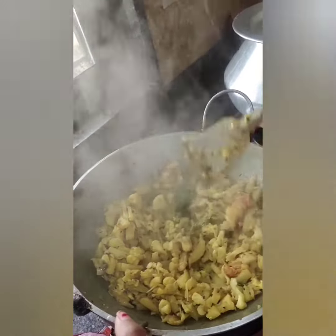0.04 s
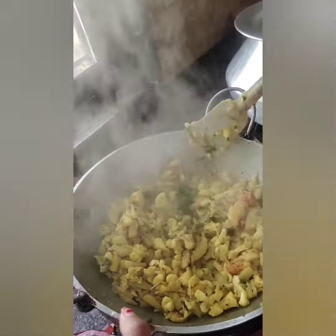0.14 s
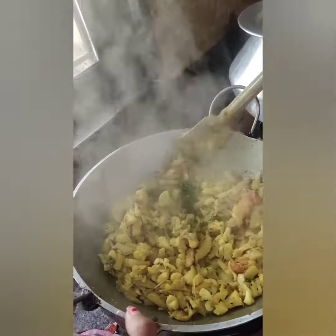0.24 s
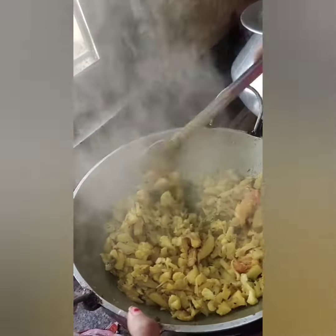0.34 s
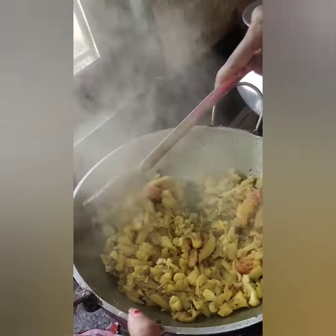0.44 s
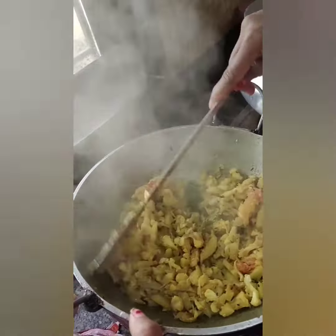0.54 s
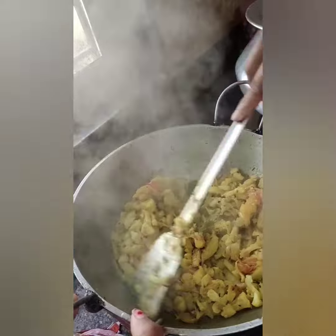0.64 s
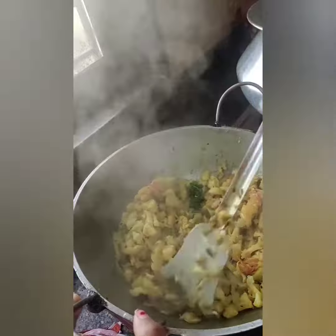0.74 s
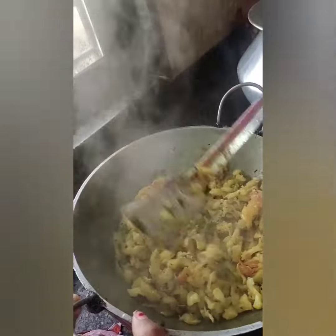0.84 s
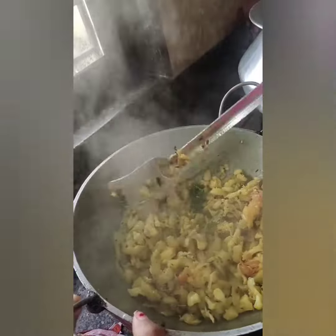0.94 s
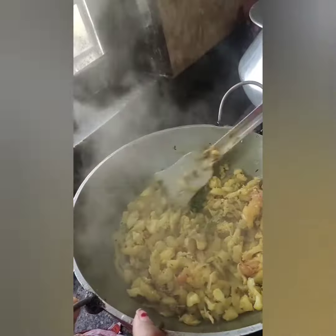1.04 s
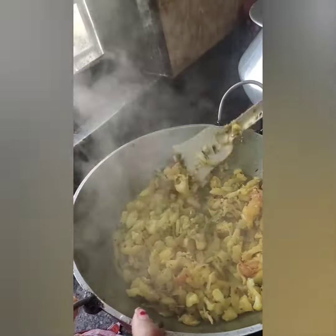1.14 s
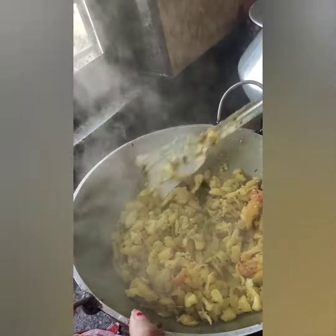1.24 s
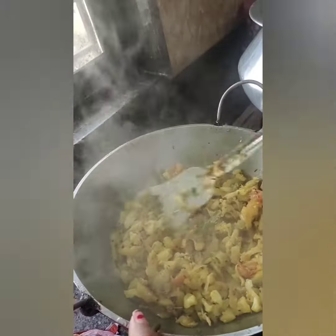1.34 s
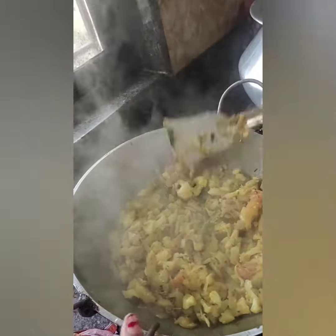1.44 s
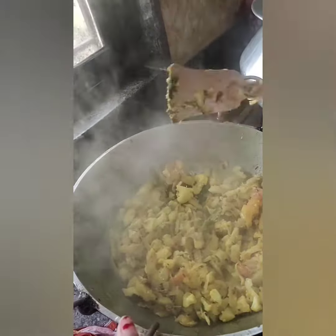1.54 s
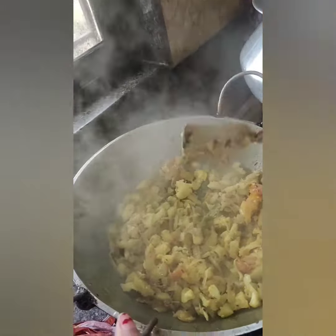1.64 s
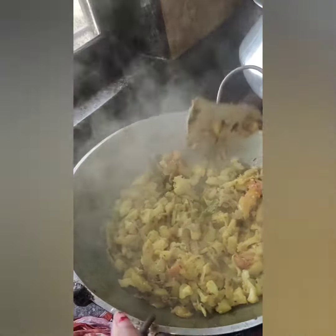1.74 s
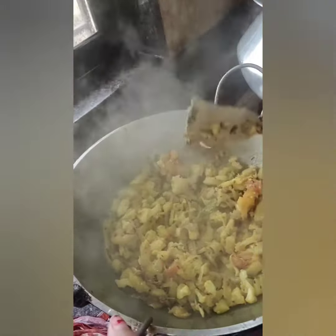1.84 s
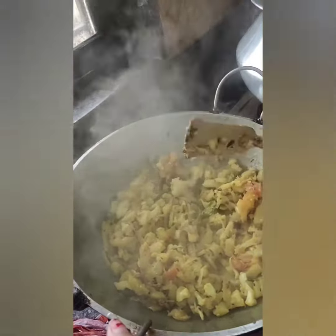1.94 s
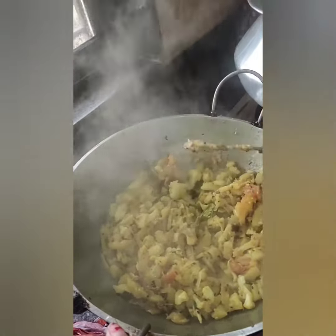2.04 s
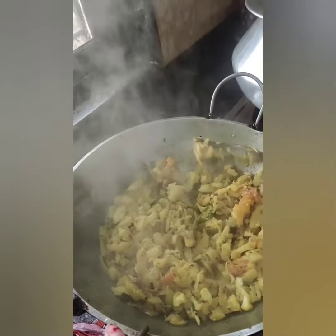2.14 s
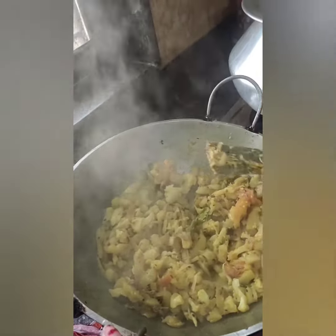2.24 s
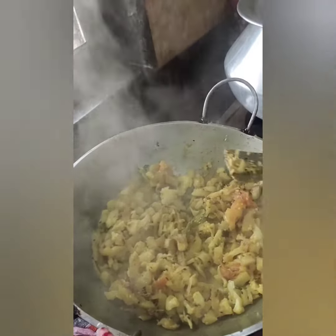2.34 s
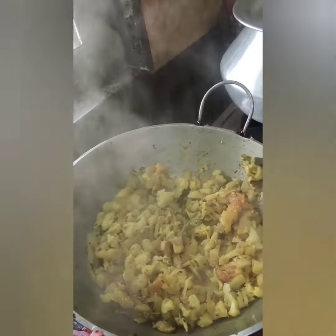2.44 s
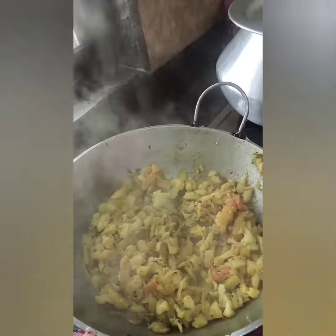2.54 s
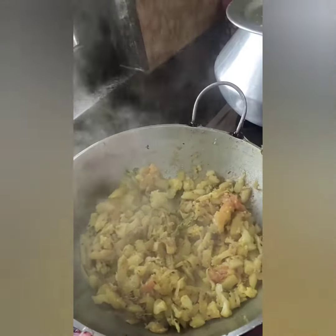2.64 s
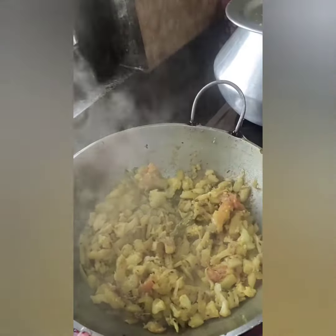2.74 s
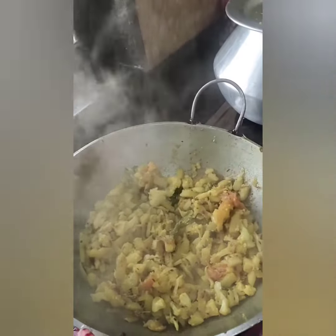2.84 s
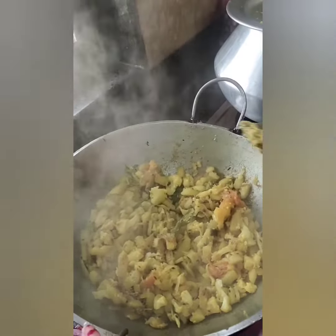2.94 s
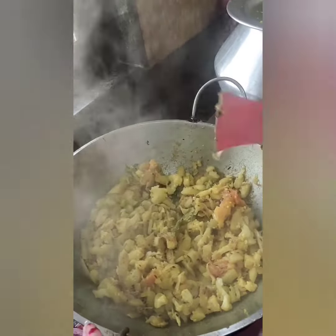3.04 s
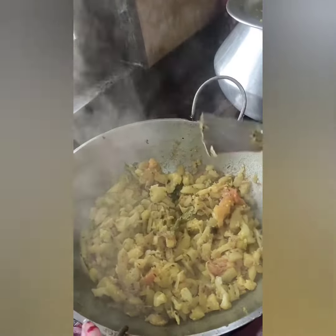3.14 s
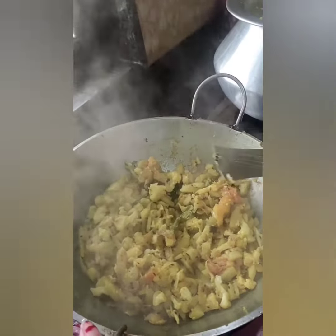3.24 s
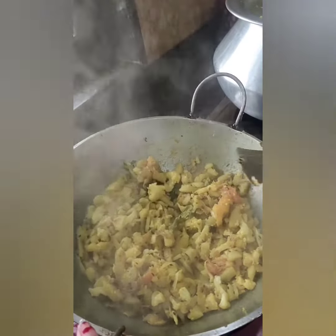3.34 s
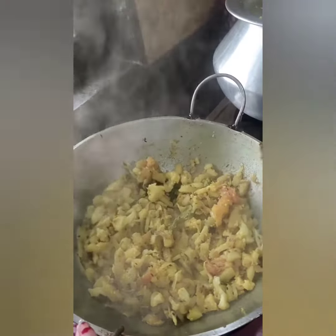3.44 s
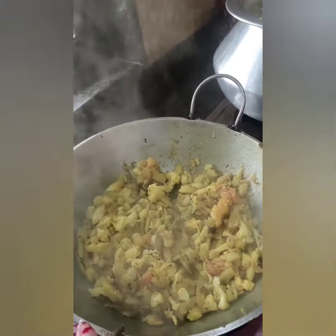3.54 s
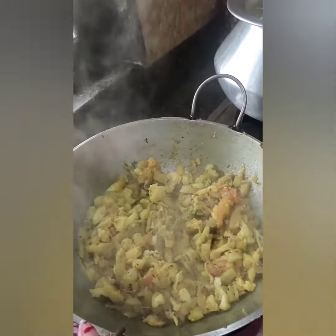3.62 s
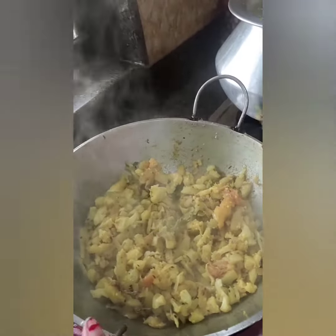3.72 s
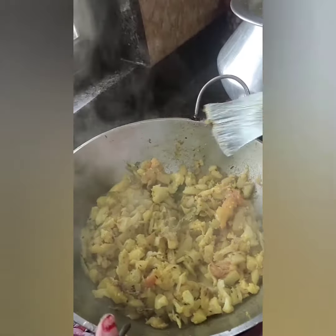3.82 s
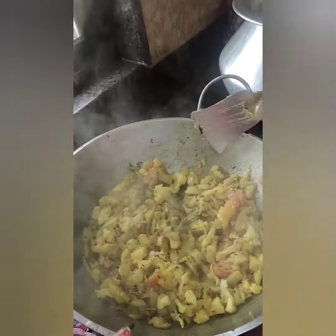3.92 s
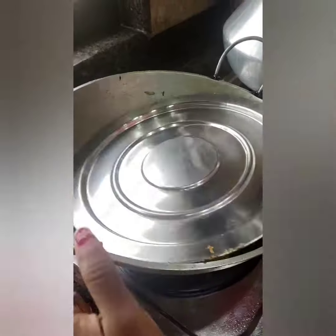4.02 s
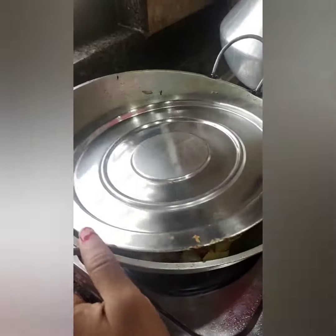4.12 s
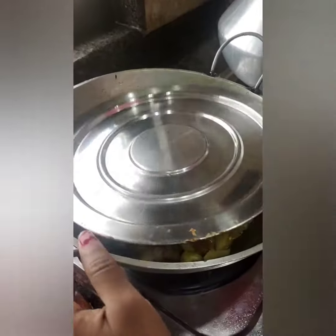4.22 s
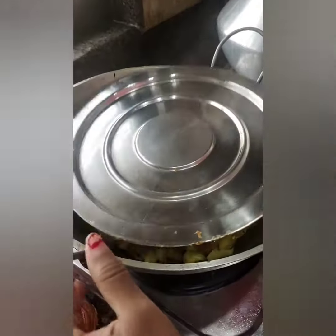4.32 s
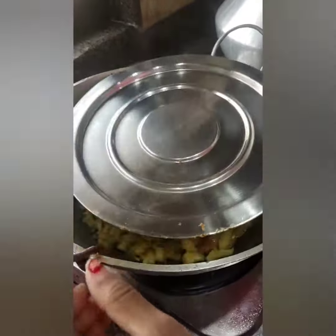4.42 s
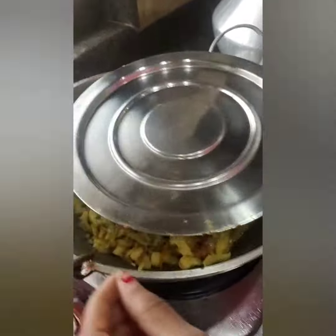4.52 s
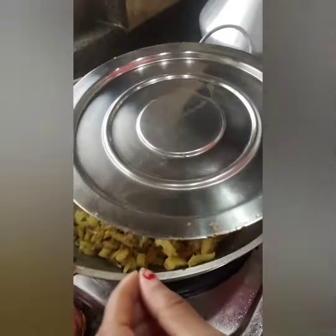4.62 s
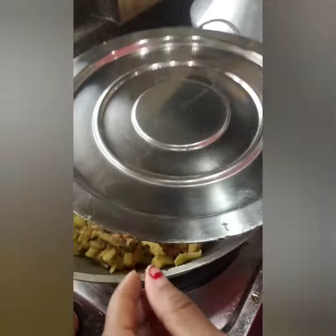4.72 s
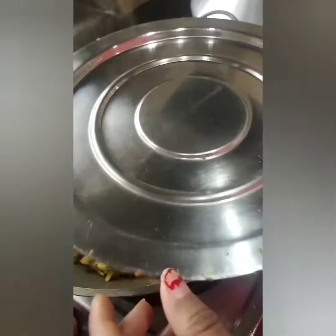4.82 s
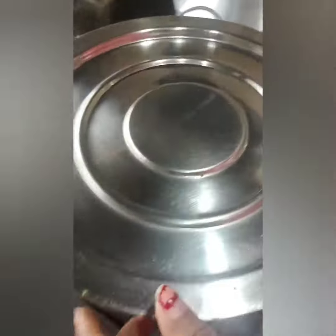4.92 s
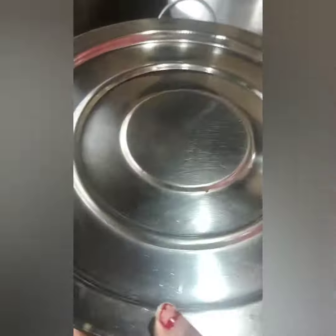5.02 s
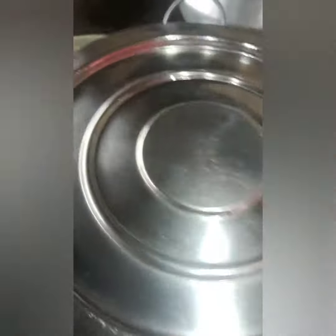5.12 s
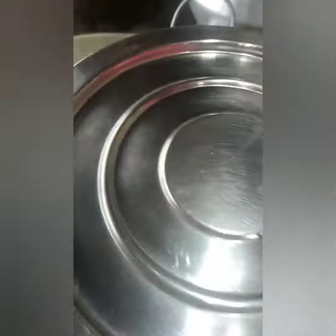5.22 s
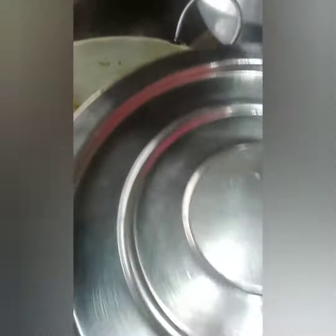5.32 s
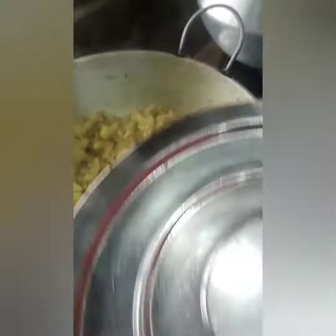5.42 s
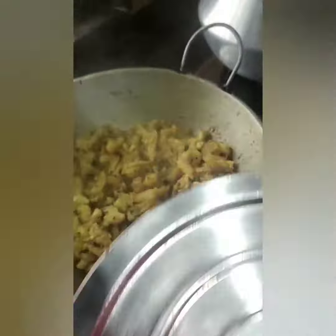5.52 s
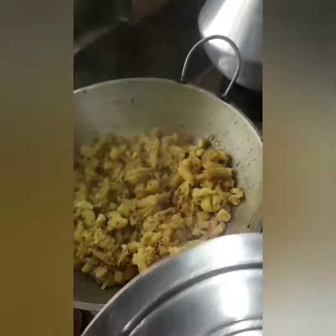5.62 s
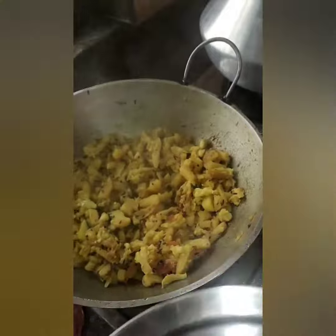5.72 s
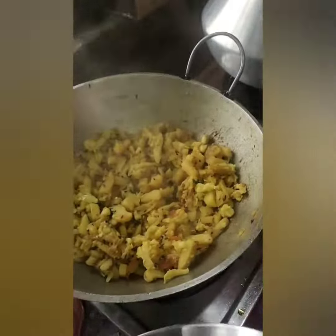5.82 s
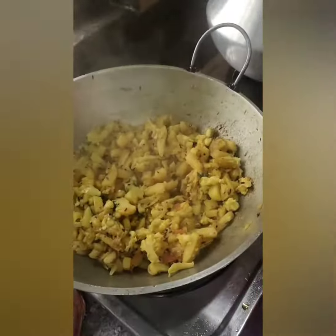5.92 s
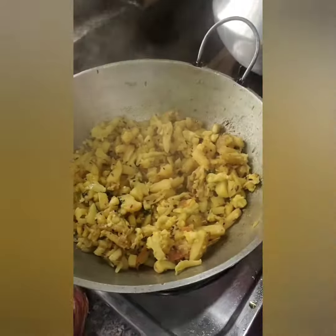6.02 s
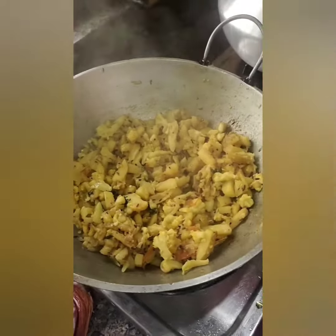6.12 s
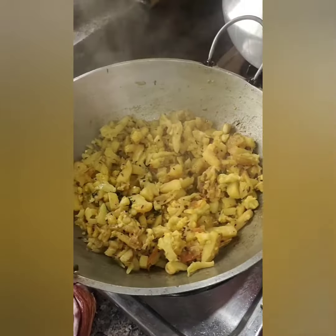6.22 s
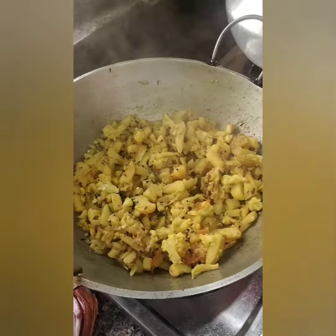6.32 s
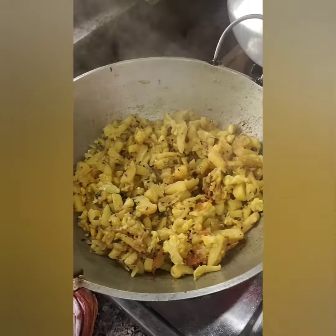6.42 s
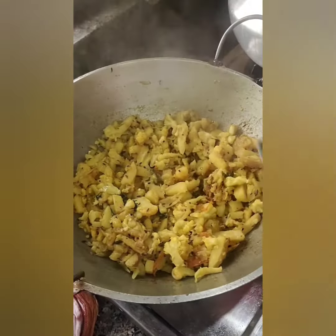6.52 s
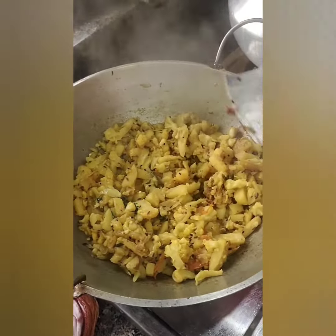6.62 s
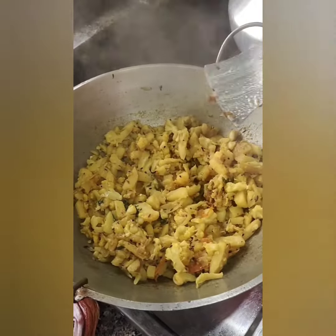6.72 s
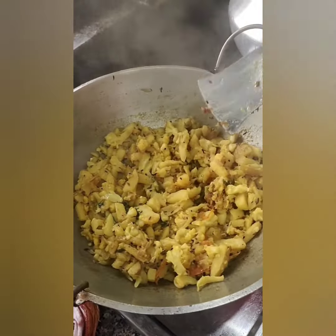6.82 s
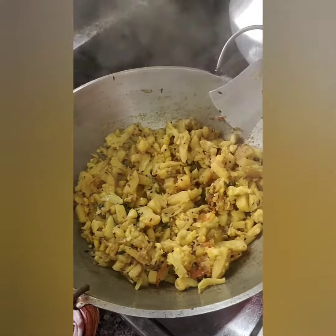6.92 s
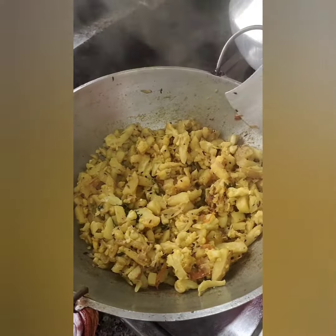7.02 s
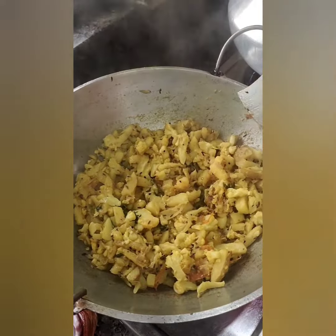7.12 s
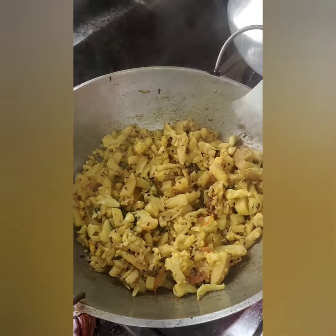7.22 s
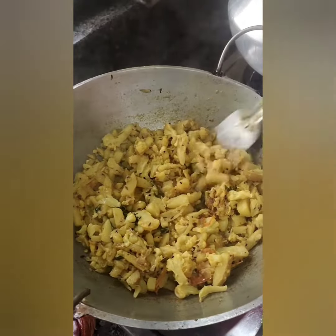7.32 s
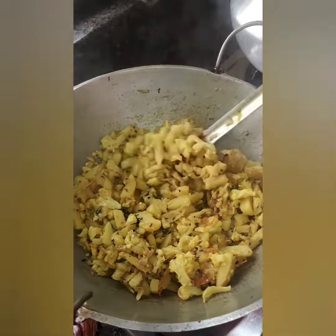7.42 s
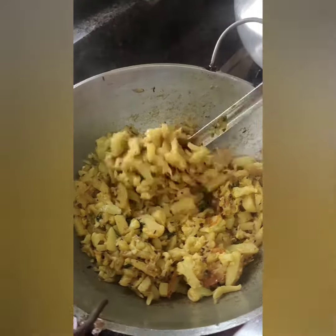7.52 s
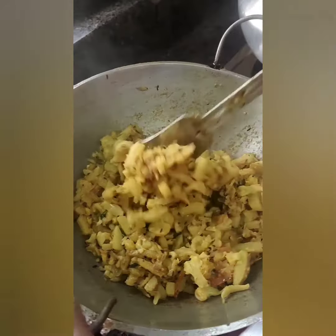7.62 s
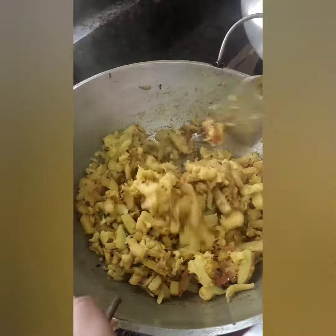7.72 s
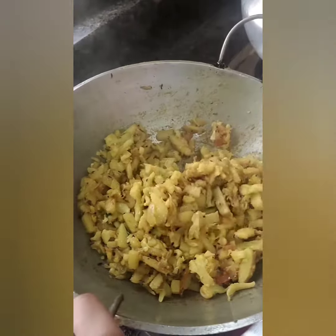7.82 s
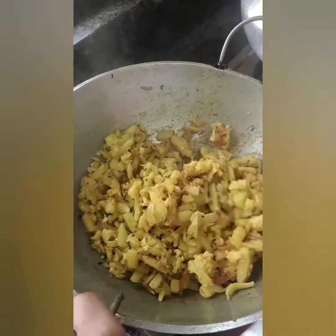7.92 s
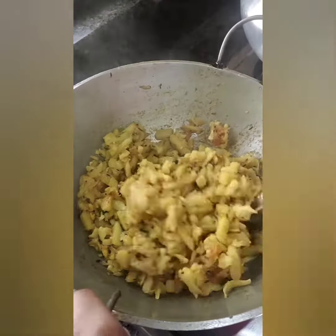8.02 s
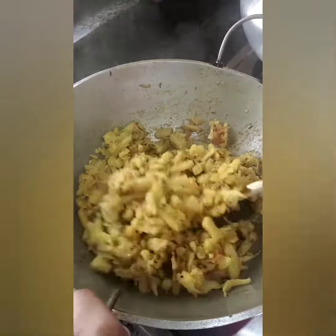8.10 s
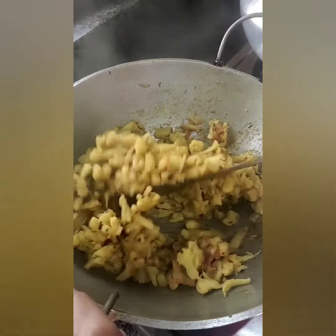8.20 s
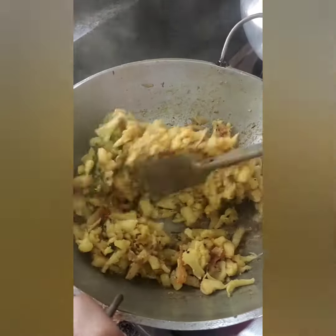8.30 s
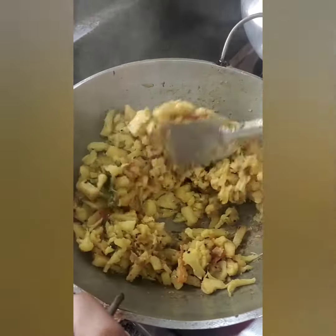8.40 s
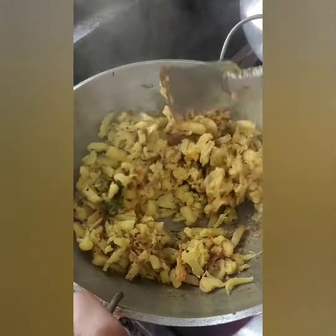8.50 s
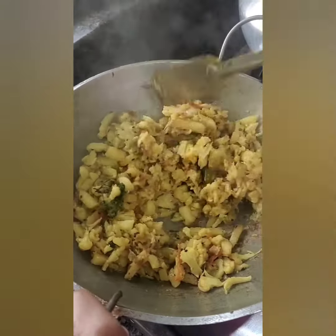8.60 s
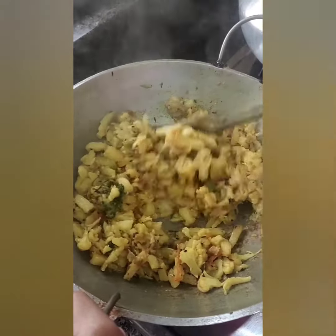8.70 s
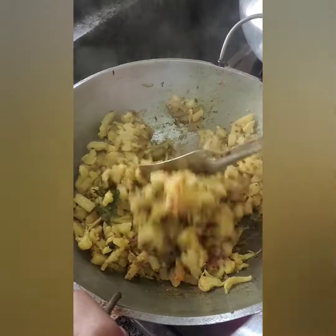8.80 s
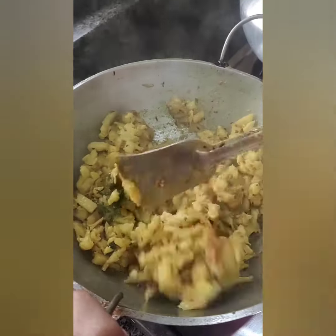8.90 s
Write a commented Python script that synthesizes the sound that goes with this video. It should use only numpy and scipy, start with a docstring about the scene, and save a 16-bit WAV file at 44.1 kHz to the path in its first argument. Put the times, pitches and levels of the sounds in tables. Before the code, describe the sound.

Vegetables sizzle in a metal wok over a roaring gas burner while a steel spatula clanks, scrapes and turns the food, with one brief mid-way silence.

```python
"""A small kitchen: vegetables sizzle close by in a metal wok, over a gas burner that roars as filtered noise.
The frying is dense noise with random spits; food tipped off the blade patters on the wok's low resonances.
A steel spatula knocks as pulses and short crashes on ringing modes, scrapes as stick-slip grains through
resonances, and at times makes the bowl sing one note. A steel lid brushes the rim with its own modes
and faint high hisses as the sound fades back in from a brief drop-out near half way."""
import sys
import numpy as np
from scipy.fft import rfft, irfft, next_fast_len
from scipy.io import wavfile
from scipy.ndimage import map_coordinates

SR = 44100
rng = np.random.default_rng(int(sys.argv[2]) if len(sys.argv) > 2 else 0)


def int16_out(signal):
    """Quantize to a 16-bit WAV file."""
    q = np.round(np.clip(np.atleast_2d(signal).T, -1, 1) * 32767)
    wavfile.write(sys.argv[1], SR, q.astype(np.int16))


N = 395119

# resonances of the spatula's blade: (centre [Hz], width [Hz], relative level [dB])
BLADE = [(6530, 150, 1.5), (6740, 110, -3), (6945, 200, 3), (7180, 90, -2.5), (7090, 52, 8),
         (7280, 120, 0.5), (7470, 84, 5), (7850, 120, -0.5), (8200, 260, -11.5), (8900, 220, -16.5)]
# bright spectrum of the blade's edge: (frequency [Hz], relative density [dB per Hz])
EDGE = [(4000, -24), (6000, 4), (8500, 5), (10000, 0.5), (12500, 2.5), (14000, -2.5), (16000, -21)]
# attack of a stroke, a sung note and a high hiss [s]
BITE_S = .025


def amp(db):
    """Decibels to gain."""
    return 10 ** (np.asarray(db) / 20)


def unit(x):
    """Scale to rms 1."""
    return x / np.sqrt(np.mean(x ** 2) + 1e-20)


def along(points, hz):
    """(Hz, value) points read on a log frequency axis."""
    f, v = np.transpose(points)
    return np.interp(np.log(hz + 1), np.log(f + 1), v)


def curves(rows):
    """One value per sample for each column after the time."""
    s, *cols = np.transpose(rows)
    return [np.interp(np.arange(N) / SR, s, c) for c in cols]


def wobble(rate):
    """A smooth random curve with rate knots a second."""
    knots = rng.standard_normal(int(N * rate / SR) + 4)
    return map_coordinates(knots, [np.arange(N) * rate / SR])


def gesture(start, length, attack, t60, slope_db=0):
    """Attack, a hold that drifts by slope_db a second, then an exponential release."""
    t = np.arange(N) / SR - start
    hold_db = slope_db * t.clip(0, length)
    release_db = -60 * (t - length).clip(0) / t60
    return np.clip(t / attack, 0, 1) * amp(hold_db + release_db)


def filtered(x, response):
    """x times a response of frequency."""
    n = x.shape[-1]
    m = next_fast_len(n + 8192)  # spare room for the filter's tail
    return irfft(rfft(x, m) * response(np.fft.rfftfreq(m, 1 / SR)), m)[..., :n]


def colour(points):
    """The response of a spectrum given as (Hz, dB) points."""
    return lambda hz: amp(along(points, hz))


def resonances(modes):
    """The response of a set of (Hz, width, dB) resonances, summed with alternating sign."""
    def response(f):
        total = 0
        for k, (centre, width, db) in enumerate(modes):
            total = total + (-1) ** k * amp(db) * 1j * f * width / (centre ** 2 - f ** 2 + 1j * f * width)
        return total
    return response


def heard(pair, response, lag_ms=0.434):
    """Two unrelated signals become one coloured stereo sound of rms 1, lag_ms later on the left."""
    # left-right likeness: (frequency [Hz], likeness [0..1])
    alike = [(30, 0.6), (80, 1), (170, 0.77), (400, 0.74), (750, 0.56), (1100, 0.28), (2200, 0.09),
             (4000, 0.07), (16000, .05)]

    def paths(hz):
        turn = np.arccos(np.clip(along(alike, hz), -1, 1)) / 2
        delay = np.exp(-1j * np.pi * hz * lag_ms / 1000)  # half the lag; the right gets the inverse
        mid, side = np.cos(turn), np.sin(turn)
        return response(hz) * np.array([[mid * delay, side * delay], [mid / delay, -side / delay]])
    return unit(filtered(pair, paths).sum(axis=1))


def noise(size=N):
    """Two channels of white noise."""
    return rng.standard_normal((2, size))


def grains(rate, spread_db):
    """Random tiny impulses, rate a second, their sizes spread exponentially in dB."""
    size = amp(spread_db * np.minimum(rng.exponential(size=N), 5))  # cap the rare extremes
    return unit((rng.random(N) < rate / SR) * size * noise())


def crowded_modes(spacing_hz, depth_db):
    """The peaks and dips of the wok's many weak modes, partly different left and right, blurred in the treble."""
    knots = np.tanh(rng.standard_normal(2048) + .6 * rng.standard_normal((2, 2048)))

    def response(hz):
        ripple = np.array([[np.interp(hz / spacing_hz, np.arange(len(k)), k)] for k in knots])
        depth = hz / (hz + 700) / (1 + (hz / 14000) ** 4)  # shallow in the bass and the top
        return amp(depth_db * ripple * depth)
    return response


def pulse(response, size):
    """The causal (minimum-phase) impulse response of a spectrum, with energy 1."""
    cepstrum = irfft(np.log(np.abs(response(np.fft.rfftfreq(4096, 1 / SR))) + 1e-4))
    fold = np.r_[1, np.full(2047, 2), np.zeros(2048)]  # moves all energy to after the onset
    x = irfft(np.exp(rfft(cepstrum * fold)))
    return np.pad(x, (0, size - len(x))) / np.linalg.norm(x)


def ringing(modes, t, lowest_hz=1):
    """Modes set off by one contact; a stiff spot hardly moves those below lowest_hz."""
    hz, db, t60 = np.transpose(modes)[:, :, None]
    swell = 1 - np.exp(-t * hz / 3)  # a mode builds up over a few cycles
    # long waves reach both sides in step, short ones in any phase
    phase = 2 * np.pi * rng.random(hz.shape) + hz / 3500 * rng.standard_normal((2, len(modes), 1))
    level_db = db + 1.5 * rng.standard_normal(phase.shape) - 60 * t / t60
    partials = amp(level_db) * np.sin(2 * np.pi * hz * t + phase)
    stiffness = np.minimum(hz / lowest_hz, 1) ** 2
    return (stiffness * swell * partials).sum(axis=1)


def burner():
    """The flame roars as turbulent low noise, with a narrow-band fluttering drone under the wok."""
    # spectrum of the roar: (frequency [Hz], relative density [dB per Hz])
    flame = [(25, -40.5), (45, -24.5), (68, -23.5), (88, -11), (110, -6.5), (140, -2.5), (175, -4.5),
             (250, -13.5), (330, -14.5), (510, -12), (830, -9.5), (1050, -19), (1300, -17), (2500, -27.5),
             (5000, -62)]
    roar = amp(-38.5 + 0.52 * wobble(7.7)) * heard(noise(), colour(flame), lag_ms=0.42)
    hollow = resonances([(111, 14, 0)])
    drone = heard(noise(), lambda hz: hollow(hz) ** 2, lag_ms=0)
    return roar + amp(-44.5) * drone


def sizzle():
    """Steam bubbles burst in the oil: a dense fizz with single spits on top, swelling and dying down."""
    # the sizzle swells as food is turned or the lid comes off:
    # (time [s], added sizzle before the common lift [dB])
    swells = [ (0.0, -45.5), (0.3, -88), (1.75, -72.5), (5.75, -54), (7.45, -49), (7.9, -43), (8.7, -42), ]
    # spectrum of the frying: (frequency [Hz], relative density [dB per Hz])
    frying = [(900, -2.5), (1800, 0.5), (2800, 6), (4000, 5), (5200, 2), (6200, 4.5), (7200, 8), (8300, 2),
              (10000, -9), (12500, -7.5), (14000, -18), (16000, -46.5)]
    # the fine spray of bursting bubbles: (frequency [Hz], relative density [dB per Hz])
    fine = [(4000, -23.5), (6000, 3), (8500, 3), (10000, 1.5), (12500, 0.5), (13700, -0.5), (14800, -6.5),
            (16000, -37)]
    simmer_db, lift_db = -51, 2.5  # undisturbed frying; lift common to frying and swells
    rise_s, fall_t60 = 0.074, 20.7  # a swell's rise and dying down [s]

    added = sum((amp(db) * gesture(s, rise_s, rise_s, fall_t60)) ** 2 for s, db in swells)
    level_db = 10 * np.log10(amp(simmer_db) ** 2 + added)
    fizz = heard(noise() + 0.58 * grains(rate=5500, spread_db=0.0), colour(frying))
    spits = heard(grains(rate=120, spread_db=2.8), colour(frying)) * amp(-10)
    # the fine treble fizz grows and shrinks with the sizzle's level
    spray_db = -0.9 + 1.06 * (level_db + 40.0).clip(-12, 3)
    spray = heard(grains(rate=4500, spread_db=-1.0), colour(fine)) * amp(spray_db)
    return amp(level_db + lift_db + 0.98 * wobble(11)) * (fizz + spits + spray)


def tumble():
    """Soft pieces patter and rustle in lumps against the bowl and excite mostly its low resonances."""
    # loads of food tipped off the blade: (start [s], length [s], level [dB])
    tosses = [ (7.521, .125, -31), (7.85, 0.31, -42), (8.362, 0.047, -42), (8.873, 0.037, -46), ]
    # the bowl's resonances under a load of food: (centre [Hz], width [Hz], relative level [dB])
    loaded_bowl = [(370, 26, 2), (497, 51, -1.5), (630, 130, -5.5), (770, 180, -5), (1310, 750, -11)]
    pour_s, settle_t60 = 0.031, 0.44  # a load slides off and settles [s]

    falling = sum(amp(db) * gesture(s, length, pour_s, settle_t60) for s, length, db in tosses)
    patter = amp(2.5 * wobble(60)) * (grains(rate=500, spread_db=1) + .5 * noise())
    return falling * heard(patter, lambda hz: resonances(loaded_bowl)(hz) / (1 + (hz / 1600) ** 4))


def lid_hiss():
    """The sliding lid gives faint high hisses: bursts of noise in the top treble."""
    # faint high hisses as the lid slides: (start [s], length [s], level [dB])
    slides = [(4.175, .03, -63), (4.547, .03, -66.5), (4.778, .07, -55), (4.947, 0.09, -59)]
    # spectrum of the hiss: (frequency [Hz], relative density [dB per Hz])
    hiss_colour = [(7000, -30), (10000, -7), (12500, 6), (14500, -5), (16000, -23.5)]
    sliding = sum(amp(db) * gesture(s, length, BITE_S, t60=0.35) for s, length, db in slides)
    return sliding * heard(noise(), colour(hiss_colour))


def clinks(modes, touches):
    """A loose steel utensil touches the rim and rings with its own modes."""
    out, t = np.zeros((2, N + SR)), np.arange(SR // 2) / SR
    for s, db in touches:
        out[:, round(s * SR):][:, :len(t)] += amp(db) * ringing(modes, t)
    return out[:, :N]


def lid_brush():
    """The lid rings in its own modes as it brushes the rim."""
    # the lid's modes: (frequency [Hz], relative level [dB], t60 [s])
    lid_modes = [(608, 3, .25), (3332, -7, .25), (3440, -9, .15), (5389, -5, .16), (5590, -9, .12),
                 (5760, -6, .15), (5910, -7, .14), (6280, -9, .15), (6831, -5, .2), (7424, -8, .15)]
    # touches on the rim: (time [s], level [dB])
    touches = [(4.149, -39.5), (4.176, -41)]
    return clinks(lid_modes, touches)


def spatula_rest():
    """The spatula rings freely in its own modes as it is laid on the rim."""
    # the spatula's modes: (frequency [Hz], relative level [dB], t60 [s])
    spatula_modes = [(670, 12.5, .024), (754, -10, .25), (1045, -.5, .06), (2030, -13, .25),
                     (2620, -7, .09), (3440, -8, .12), (4070, -9, .08), (4160, -11, .08), (4205, -7, .15),
                     (4850, -15, .13)]
    # rests on the rim: (time [s], level [dB])
    rests = [(3.2954, -24)]
    return clinks(spatula_modes, rests)


def singing(lag_ms=-0.23):
    """Stick and slip lock on to one mode of the bowl: a wavering note that sags as it rings out."""
    # the blade on bare metal: (start [s], length [s], starting pitch [Hz], level [dB], t60 [s])
    notes = [(.37, .04, 1580, -49, .12), (2.45, .04, 1040, -37, 0.18), (6.677, 0.037, 833, -27.5, 0.3),
             (6.957, .02, 739, -27, 0.24), (6.968, 0.039, 830, -24.5, 0.76), (7.207, 0.053, 770, -33, 0.19)]
    sag_hz_per_s, waver_hz = 55, 15

    out, t = np.zeros((2, N)), np.arange(N) / SR
    for s, length, hz, db, t60 in notes:
        pitch = hz - sag_hz_per_s * (t - s).clip(0, .5) + waver_hz * wobble(90)
        offset = np.array([[-1], [1]]) * hz * lag_ms / 2000  # left-right lag, in cycles
        cycles = np.cumsum(pitch) / SR + offset
        out += amp(db) * gesture(s, length, BITE_S, t60) * np.sin(2 * np.pi * cycles)
    return out * amp(1.5 * np.array([wobble(60), wobble(60)]))


def bent(x, share):
    """Play a stereo sound slower by a varying share, which pulls its pitch flat."""
    position = np.cumsum(1 - share)
    return np.array([map_coordinates(side, [position], mode="mirror") for side in x])


def scrapes(metal):
    """Metal sticks and slips as it slides; the slips ring the bowl, the wall and the blade itself."""
    # metal slides and scuffs, mostly of the spatula on the wok, some faint handling of lid or spatula:
    # (start [s], length [s], bowl groan [dB], wall rasp [dB], blade hiss [dB]), all relative levels
    strokes = [ (0.294, 0.041, -62, -41.5, -26.5), (0.35, 0.051, -56, -41, -34),
               (0.422, 0.027, -48, -53, -35.5), (0.497, 0.024, -49, -51, -46),
               (2.431, 0.029, -35.5, -44.5, -38.5), (4.136, 0.055, -50, -52, -40.5),
               (5.598, .03, -43, -52, -50), (5.935, 0.079, -61, -49, -39.5), (6.089, 0.038, -62, -48, -40),
               (6.672, 0.065, -27.5, -28, -26.5), (6.888, 0.035, -26.5, -20, -17),
               (6.946, 0.062, -24, -32.5, -25.5), (7.196, 0.044, -33, -42, -36),
               (7.326, 0.031, -39, -42, -29), (7.413, 0.068, -43.5, -42.5, -31),
               (7.487, 0.027, -38.5, -47.5, -42), (7.54, 0.039, -46, -40, -34.5),
               (7.89, .025, -40, -42, -26), (8.123, 0.072, -50, -41.5, -34), (8.338, .08, -43.5, -51, -35),
               (8.806, 0.15, -65, -48.5, -39), ]
    # bowl resonances that a stroke excites: (centre [Hz], width [Hz], relative level [dB])
    bowl_modes = [(282, 4.8, 0.5), (608, 8.6, -3.5), (670, 32, -5.5), (747, 31, -2.5), (802, 62, -1),
                  (1016, 55, -2.5), (1070, 40, -12), (1280, 56, -10.5), (1500, 32, -16), (1647, 41, -10),
                  (1910, 33, -11), (2260, 37, -12.5)]
    # the rubbed wall's broad colour: (frequency [Hz], relative density [dB per Hz])
    rasp_colour = [(900, -22), (1400, 9), (1700, 11), (2000, 7), (2300, -12), (2650, 11), (3050, 4),
                   (3330, 4), (3600, 5), (4150, -5), (4600, 4), (4900, 5.5), (5800, 2.5), (8000, -12)]
    # the wall's resonances under rubbing: (centre [Hz], width [Hz], relative level [dB])
    rim_modes = [(1130, 30, -3), (1290, 30, -4), (1560, 16, -2), (1680, 18, -2), (1770, 16, -4),
                 (1918, 18, 0), (2219, 16, 2), (2314, 20, -1), (2433, 30, 0), (2560, 30, -3),
                 (2960, 50, -3), (3060, 40, -3), (3305, 50, 0), (3450, 50, -3), (3760, 50, -6),
                 (4051, 25, -1), (4137, 25, 0), (4231, 30, -3), (4390, 40, -6), (5380, 50, -6),
                 (5593, 40, -5), (5849, 40, -2)]
    groan_t60, wall_t60, blade_t60 = 0.28, 0.48, 0.41  # ring-out once the blade lifts [s]
    # on the way down the wall the hiss sags and the groan grows [dB per s]
    hiss_sag, groan_growth = 29, 40
    # the pressed blade pulls resonances flat [share of pitch], less as it slides on [dB per s]
    press_bend, press_ease = .03, 150
    # the blade judders, and its resonances wander as its angle changes [share of pitch]
    judder_db, blade_wander = 2.1, .012

    groaning, rasping, hissing, pressing = np.zeros((4, N))
    for s, length, groan_db, rasp_db, hiss_db in strokes:
        groaning += amp(groan_db) * gesture(s, length, BITE_S, groan_t60, slope_db=groan_growth)
        rasping += amp(rasp_db) * gesture(s, length, BITE_S, wall_t60)
        hissing += amp(hiss_db) * gesture(s, length, BITE_S, blade_t60, slope_db=-hiss_sag)
        press = gesture(s, length, BITE_S, groan_t60, slope_db=-press_ease)
        pressing = np.maximum(pressing, press)

    slips = amp(judder_db * wobble(110)) * (grains(rate=800, spread_db=1) + .45 * noise())

    def rub(body):
        return heard(slips, body, lag_ms=-0.36)
    groan = rub(lambda hz: resonances(bowl_modes)(hz) * metal(hz) / (1 + (hz / 3200) ** 4))
    blade = bent(rub(resonances(BLADE)), blade_wander * wobble(16))
    edge = rub(lambda hz: colour(EDGE)(hz) * metal(hz))
    hiss = amp(-3.5) * blade + amp(-6.5) * edge
    broad_rasp = rub(lambda hz: colour(rasp_colour)(hz) * metal(hz))
    rasp = amp(-5) * broad_rasp + amp(-2) * rub(resonances(rim_modes))

    flat = press_bend * pressing
    return groaning * bent(groan, flat) + rasping * bent(rasp, flat) + hissing * hiss


def strikes(metal):
    """A blow is a sharp pulse and a short crash of crowded modes; the wok's clear modes ring at its given level."""
    # taps on the wok, mostly of the spatula, once of the lid: (time [s], level [dB], bowl knock [dB],
    # wall clank [dB], clank tilt [dB per octave], edge tick [dB], blade ring [dB], knock pitch [Hz],
    # t60 [s], wok ring [dB], L-R [dB]); the parts' levels are relative
    blows = [ (0.2601, -6.5, -29, -24.5, 13, -20.5, -8.5, 806, 0.076, -48, 4),
             (0.692, -34, -25, -13.5, 9.5, -11, -11, 700, .09, -35, 1.5),
             (1.642, -28, -24, -15.5, 6, -18.5, -14.5, 700, 0.083, -35, 0.5),
             (1.849, -9, -17, -12.5, 2, -12.5, -9.5, 510, 0.23, -16, -1),
             (1.9961, -14, -16, -9, -2, -11.5, -13.5, 385, 0.12, -14, -1.5),
             (2.2282, -25, -14.5, -13, 13, -11, -12, 590, 0.079, -25, 2),
             (3.2952, -10.5, -16, -20, 8, -25, -12, 650, 0.069, -25, -0.5),
             (4.552, -41, -22, -24, 0, -3.5, -18, 711, 0.047, -30, 5.5),
             (6.084, -27.5, -27, -15.5, 12, -13, -12, 603, 0.17, -33, 7),
             (6.6818, -7, -24.5, -19.5, 3.5, -13, -6.5, 930, 0.19, -30, 1.5),
             (6.893, -9, -31, -22, 6, -15.5, -7, 900, 0.27, -31, 5),
             (6.9035, -19, -12, -21, 0, -23, -16.5, 820, 0.18, -21, 1),
             (6.933, -12, -30.5, -17.5, 9, -10, -9, 800, .15, -17.5, 3),
             (6.9885, -16, -7.5, -14.5, -9, -31, -24, 756, 0.1, -16.5, -0.5),
             (7.346, -30, -18, -13, 8, -24.5, -14, 800, 0.14, -35, 0.5),
             (7.3822, -11, -22.5, -12.5, 11, -17, -9.5, 890, 0.084, -32, 4),
             (7.642, -27.5, -14, -17.5, 4, -12, -22, 500, 0.11, -25, 3.5),
             (7.707, -29.5, -13, -20, 2, -14, -18, 600, .07, -23, -0.5),
             (7.8504, -4.5, -30, -29, 15.5, -19, -10.5, 830, 0.096, -40, -0.5),
             (8.601, -31, -29, -14, 4, -7, -14, 503, 0.14, -24, -2),
             (8.75, -11.5, -19, -22.5, 14.5, -17.5, -10.5, 610, 0.085, -33, -2),
             (8.8252, -31.5, -34, -20.5, 5.5, -7, -18, 700, 0.03, -33, 2), ]
    # the wok's clear modes: (frequency [Hz], relative level [dB], t60 [s])
    wok_modes = [(275, -2, .3), (376, 8.5, .22), (428, 0, .2), (480, -3, .15), (531, -2, .27),
                 (561, -4, .22), (608, -5, .25), (651, -2, .35), (980, -4, .22), (1094, -5, .2),
                 (1409, -6, .19), (1685, -11, .3), (2028, 0, .28), (2124, -3, .18), (2219, -6, .16),
                 (2595, -7, .12), (2977, -9, .17), (4286, 1, .3), (4390, -6, .18), (5040, -9, .16),
                 (6220, -1, .28), (6268, -2, .33), (6586, -3, .2), (6840, -2, .18), (7214, 1, .23),
                 (7682, -4, .15), (9700, -11, .15)]
    # spectrum of the struck wall: (frequency [Hz], relative density [dB per Hz])
    wall_colour = [(700, -18), (1050, 3.5), (1400, -4), (1700, -3), (2150, 5), (2550, 2.5), (3050, -5),
                   (3450, -3), (3800, -9), (4200, 0), (4600, -8), (5100, -5), (5800, -7), (8000, -25),
                   (16000, -50)]
    contact_s, build_s = .0002, 0.0039  # rise of a blow; build-up of its ring [s]
    crash_db, crash_t60 = 5.5, .024  # the first crash: level over the ring [dB], decay [s]
    kitchen_t60 = .45  # the room's decay [s]

    out, t = np.zeros((2, N + SR)), np.arange(SR * 3 // 4) / SR
    for s, db, knock_db, clank_db, tilt_db, tick_db, blade_db, knock_hz, t60, ring_db, pan_db in blows:
        def burst(body):
            return heard(noise(size=len(t)), lambda f: body(f) * metal(f), lag_ms=-.07 * pan_db)

        def bowl(f):
            return resonances([(knock_hz, .8 * knock_hz, 0)])(f) ** 2

        def wall(f):
            return colour(wall_colour)(f) * amp(tilt_db * np.log2(1 + f / knock_hz))

        contact = amp(knock_db + 19.5) * pulse(bowl, size=len(t))
        contact = contact + amp(clank_db + 18.5) * pulse(wall, size=len(t))
        contact = contact + amp(blade_db + 18.5) * pulse(resonances(BLADE), size=len(t))
        knock = amp(knock_db) * burst(bowl)
        clank = amp(clank_db + 3.5) * burst(wall)
        tick = amp(tick_db + 1.0) * burst(colour(EDGE))
        blade = amp(blade_db) * burst(resonances(BLADE))
        # a hard first crash, then the metal's decay and the kitchen's faint answer build up behind it
        room = amp(-12.5 - 60 * t / kitchen_t60)
        tail = (amp(-60 * t / t60) + room) * (1 - np.exp(-t / build_s))
        decay = amp(crash_db - 60 * t / crash_t60) + tail
        crash = (knock + clank + tick + blade) * decay * (1 - np.exp(-t / contact_s))
        ring = amp(ring_db) * ringing(wok_modes, t, lowest_hz=knock_hz)
        side_db = np.array([[pan_db], [-pan_db]]) / 2
        out[:, round(s * SR):][:, :len(t)] += amp(db + side_db) * (contact + crash + ring)
    return out[:, :N]


def scene():
    """Flame, frying, food, lid and spatula together."""
    background = burner() + sizzle() + tumble() + lid_hiss() + lid_brush()
    scraping = singing() + scrapes(crowded_modes(spacing_hz=40, depth_db=8.5))
    knocking = spatula_rest() + strikes(crowded_modes(spacing_hz=35, depth_db=6))
    return background + scraping + knocking


def record(dry):
    """Left and right differ in colour, mostly in the top octave; a short drop-out; rounded peaks; a band limit."""
    # colour difference of the sides: (frequency [Hz], L-R [dB])
    side_colour = [(300, 0), (600, -1), (2000, -1), (5000, 0), (9000, 2), (11000, 9), (12500, 11),
                   (14500, 7), (16000, 2)]
    # the drop-out: (time [s], gain [dB])
    fade = [(3.998, -0.5), (4.02, -63), (4.04, -100), (4.12, -100), (4.147, -14), (4.25, -6), (4.3, -5.5),
            (4.38, -0.5)]

    def sides(hz):
        ratio = amp(along(side_colour, hz))
        return np.array([ratio, np.ones_like(ratio)]) / np.sqrt((1 + ratio ** 2) / 2)
    fade_db, = curves(fade)
    x = filtered(dry, sides) * amp(fade_db)
    x = x / (1 + np.abs(x / .9) ** 6) ** (1 / 6)  # rounds peaks off towards 0.9
    return filtered(x, lambda hz: hz < 15900)


dry = scene()
out = record(dry)
int16_out(out)
```